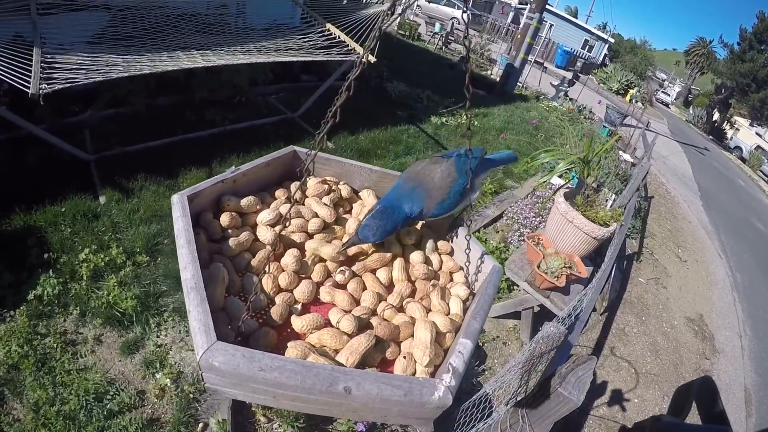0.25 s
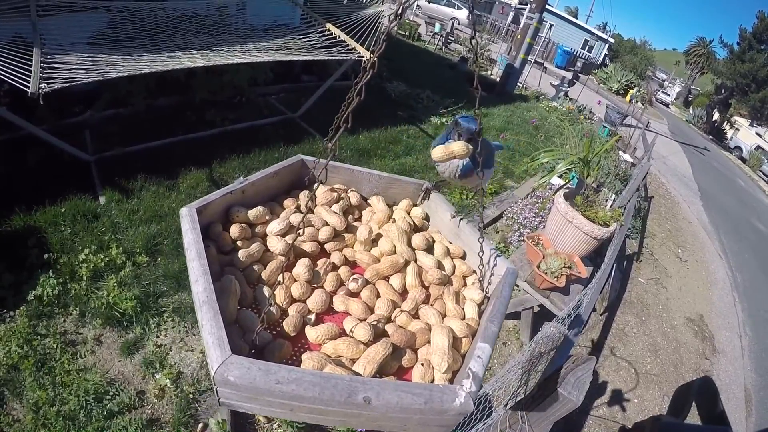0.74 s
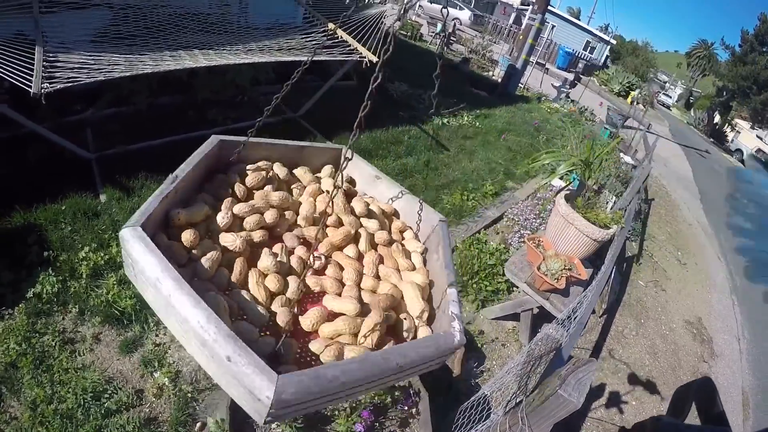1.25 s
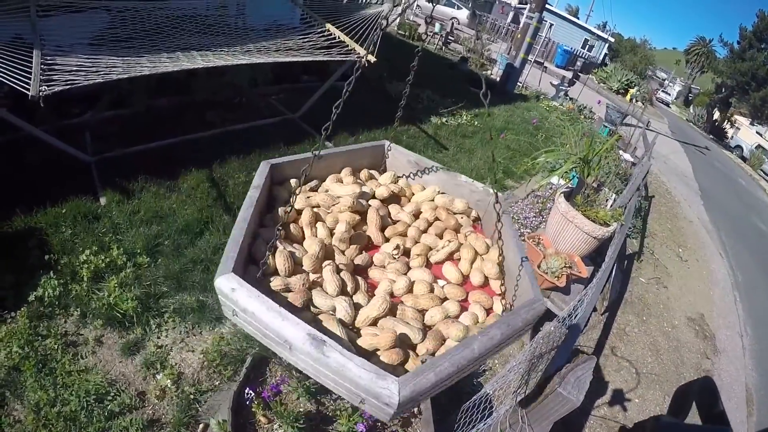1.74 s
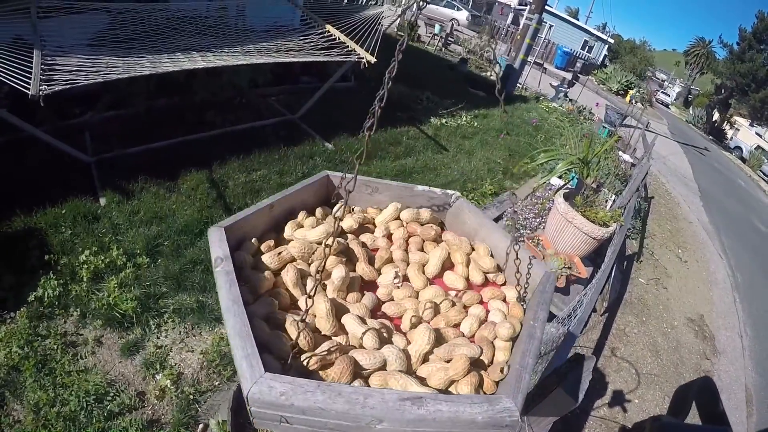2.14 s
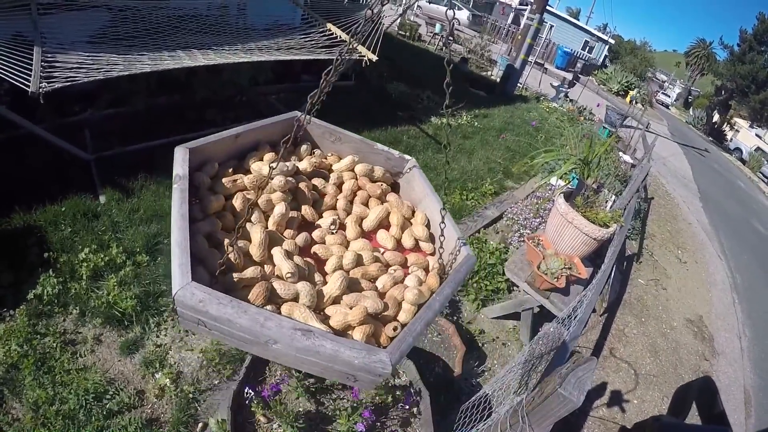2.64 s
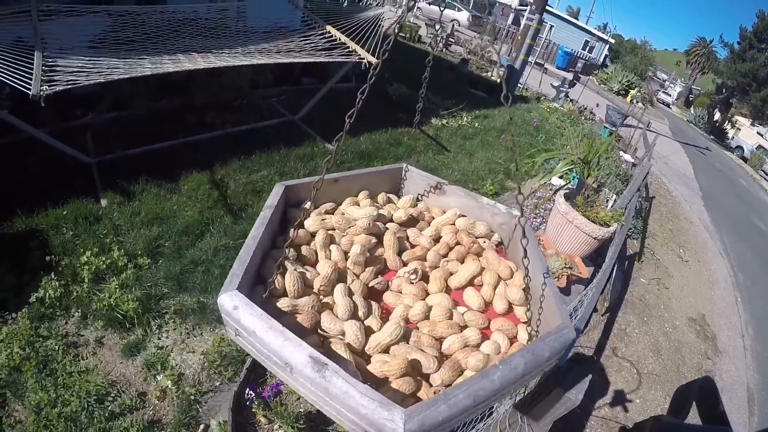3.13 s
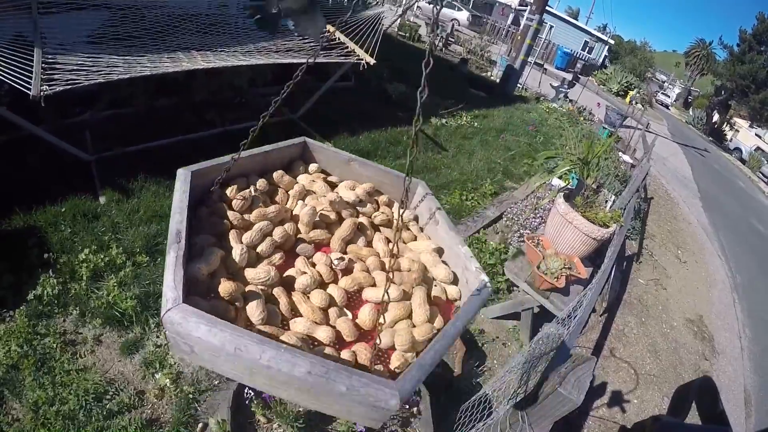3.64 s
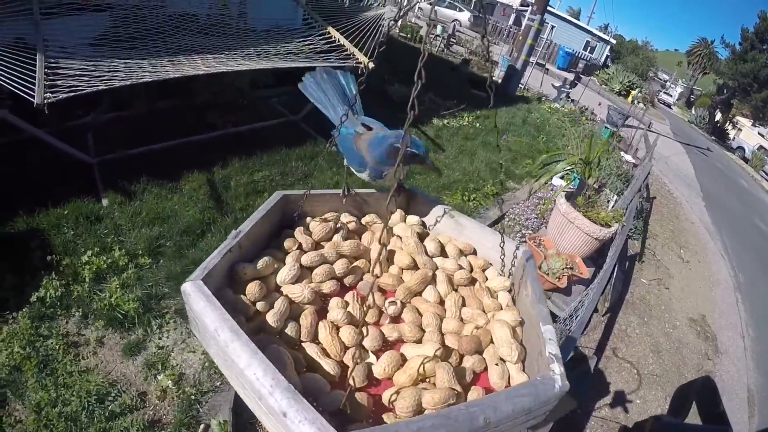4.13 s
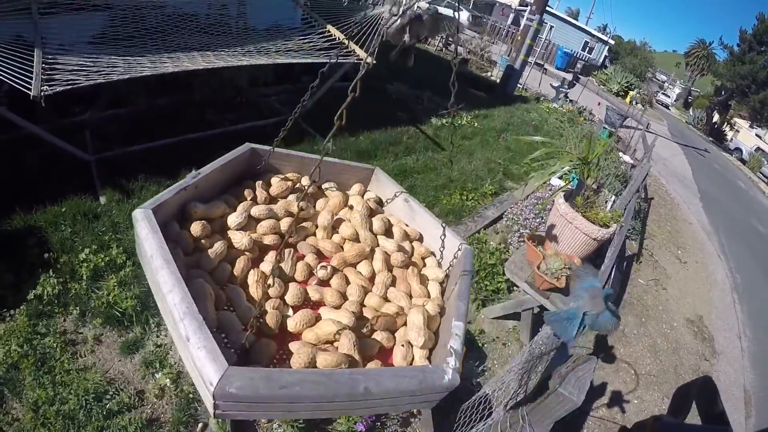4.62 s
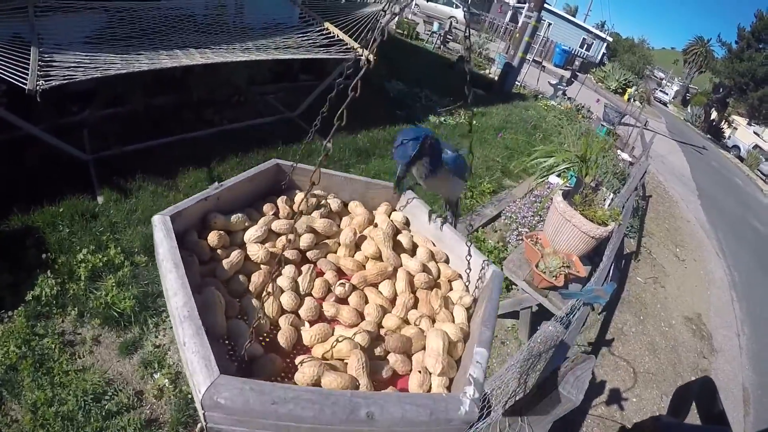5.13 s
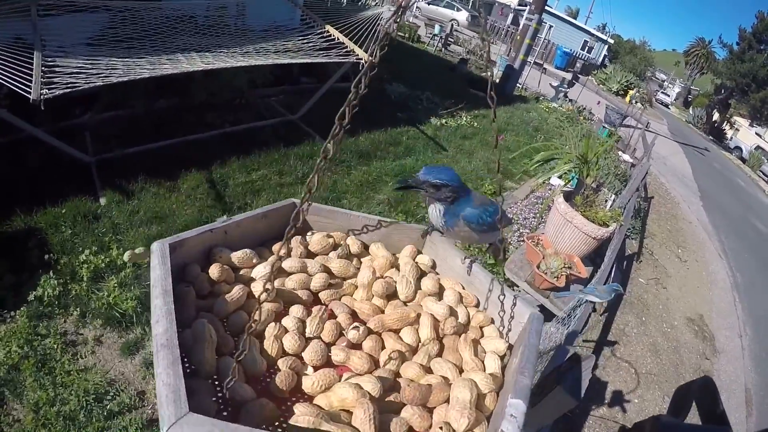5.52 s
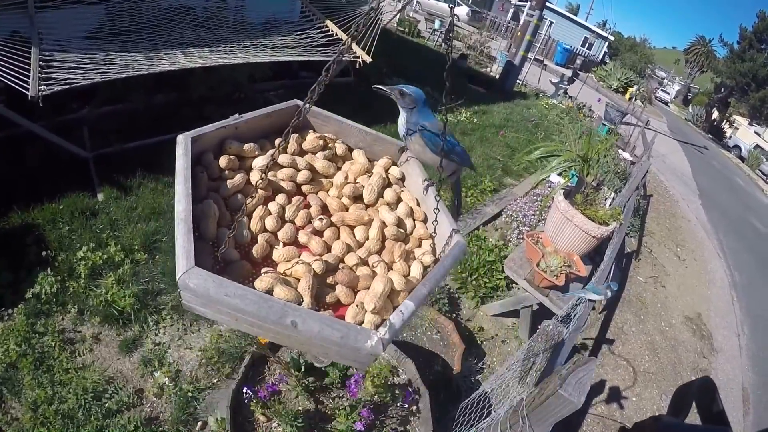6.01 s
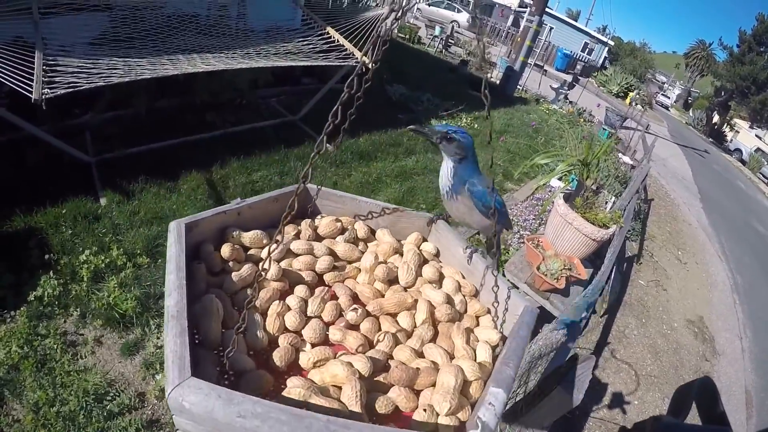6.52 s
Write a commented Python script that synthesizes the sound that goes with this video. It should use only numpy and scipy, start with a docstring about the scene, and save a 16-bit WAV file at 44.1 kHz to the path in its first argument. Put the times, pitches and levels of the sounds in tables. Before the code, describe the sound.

A jay rasps two runs of five harsh calls over hollow wooden tray knocks, ticking claws and gusts rumbling on the microphone outdoors.

```python
"""In a breezy front yard, a wooden tray feeder swings on chains: blows set its boards ringing, claws tick on the rim.
A jay gives two runs of five harsh calls, made of two gliding voices and the tones between them.
A dove coos and a small bird twitters in near-sine notes; filtered noise rustles faintly.
A wind chime tube rings twice as a pair of close tones, and an engine pulls away far off as a stack of sines.
Gusts of noise rumble on the microphone over the street's drone and hiss and a faint whine."""
import sys
import numpy as np
from scipy import signal
from scipy.fft import rfft, irfft, next_fast_len
from scipy.io import wavfile
from scipy.ndimage import uniform_filter1d

SR = 44100
rng = np.random.default_rng(int(sys.argv[2]) if len(sys.argv) > 2 else 0)


def transcribe(u):
    """Save the signal u as a 16-bit wav file named by the first command-line argument.

    u: samples, shape (n,) or (channels, n), limited to [-1, 1]; the rate is SR.
    q: integer samples, one column per channel.
    """
    v = np.clip(np.atleast_2d(u).T, -1, 1)
    q = np.round(v * 32767).astype(np.int16)
    wavfile.write(sys.argv[1], SR, q)


N = 298185
TIME = np.arange(N) / SR


def amp(db):
    """Gain of a level in dB."""
    return 10 ** (np.asarray(db) / 20)


def rms_one(x):
    """Scale a sound to an rms (average strength) of 1."""
    return x / np.sqrt(np.mean(x ** 2) + 1e-20)


def columns(rows, t):
    """Read each column of a curve table at times t; the first column holds the table's own times."""
    s, *cols = np.transpose(rows)
    return [np.interp(t, s, c) for c in cols]


def at_hz(points, hz):
    """Read the dB of a spectrum at hz, with straight lines on a log-frequency axis."""
    points = np.array(points)
    return np.interp(np.log(hz), np.log(points[:, 0]), points[:, 1])


def band(x, low_hz, high_hz, order=2):
    """Keep only the sound between two frequencies."""
    sos = signal.butter(order, [low_hz, min(high_hz, .49 * SR)], "band", fs=SR, output="sos")
    return signal.sosfilt(sos, x)


def wander(rate_hz, size=N):
    """Random drift of rms 1: noise smoothed so that little faster than rate_hz is left."""
    r = np.exp(-2 * np.pi * rate_hz / SR)
    run_in = int(SR / rate_hz)
    noise = rng.standard_normal(size + run_in)
    return rms_one(signal.lfilter([1], [1, -2 * r, r * r], noise)[run_in:])


def ring(x, hz, t60):
    """One way a body can vibrate: a unit click starts a sine of height 1 that falls 60 dB in t60 seconds."""
    r = amp(-60 / (t60 * SR))
    w = 2 * np.pi * hz / SR
    return signal.lfilter([0, np.sin(w)], [1, -2 * r * np.cos(w), r * r], x + 1e-18)


def coloured(spectrum):
    """Noise with a given spectrum, rms 1."""
    size = next_fast_len(N)
    hz = np.maximum(np.arange(size // 2 + 1) * SR / size, 1)
    shaped = rfft(rng.standard_normal(size)) * amp(at_hz(spectrum, hz))
    return rms_one(irfft(shaped, size)[:N])


def notes(tables, tremble_db):
    """Soft sine notes that follow curves of pitch and level, with a slight random tremble in level."""
    out = np.zeros(N)
    for note in tables:
        hz, db = columns(note, TIME)
        on = (TIME > note[0][0]) & (TIME < note[-1][0])
        tone = np.sqrt(2) * np.sin(2 * np.pi * np.cumsum(hz) / SR)
        out += on * amp(db + tremble_db * wander(22)) * tone
    return out


def struck(events, modes):
    """Each blow is a short rattle of contacts that sets off the vibrations (modes) of the wood."""
    size = 1000      # samples of push in each blow
    out = np.zeros(N)
    chance = rng.standard_normal((len(events), size))
    for hz, level_db, t60, board in modes:
        force = np.zeros(N + size)
        for (s, db, contact_ms, side_db, tilt_db), noise in zip(events, chance):
            # low modes build up later
            t = TIME[:size] / (max(contact_ms, .2) / 1000) * (hz / 1000) ** .35
            push = noise * (t + 0.18) * np.exp(-2.5 * t)
            # how much of this push the mode takes up, evened out below
            at_mode = abs(np.sum(push * np.exp(2j * np.pi * hz * TIME[:size])))
            taken = at_mode + .3 * np.sqrt(np.sum(push ** 2))
            tilt = tilt_db * np.log2(hz / modes[0][0])
            gain_db = db + level_db + tilt + np.sign(board) * side_db / 2
            begin = int(s * SR)
            force[begin:begin + size] += amp(gain_db) * push / taken
        out += ring(force[:N], hz, t60)
    return band(out, 380, 20000, order=3)      # small boards radiate no bass


def wind():
    """Eddies press on the microphone: a lumpy rumble and a faster flutter, rounded off when strong."""
    # Strength of the wind. Each row: time in seconds, rumble level in dB, flutter level in dB.
    gusts = [(0, -38.5, -56), (.38, -30, -51.5), (1.0, -41, -48.5), (1.09, -27, -33), (1.49, -27, -41),
             (1.73, -42.5, -58), (1.94, -33, -40.5), (2.4, -40.5, -42.5), (3.2, -49.5, -55.5),
             (3.63, -29.5, -42.5), (4.2, -44, -56), (4.4, -36.5, -49), (4.5, -31, -36.5), (4.95, -27, -38),
             (5.14, -36.5, -59), (5.59, -27, -45.5), (5.65, -26, -32), (6.4, -22.5, -29.5),
             (6.48, -37, -45), (6.7, -20, -31.5), (6.76, -13.5, -29)]
    # Single eddies. Each row: time in seconds, change of the rumble in dB, change of the flutter in dB.
    buffets = [(.39, 7, 5), (.74, 11, 13.5), (1.1, 10.5, 12.5), (1.26, 11, -2), (1.9, 14.5, 15),
               (2.129, 11.5, 8), (2.26, 10, 5), (3.6, 9.5, 6), (4.31, 4.5, 3), (4.58, 5.5, 1),
               (4.95, 5.5, 5), (5.672, 9, 13.5), (5.79, 8, 12), (5.88, 2, 3.5), (6.009, 4.5, 3),
               (6.182, 5, 12.5), (6.311, -1, 7.5), (6.681, -8.5, 16.5)]
    # Colour of the flutter. Each row: frequency in Hz, level in dB per Hz.
    flutter_colour = [(41, -28), (70, 10), (120, -4.5), (302, -23), (485, -28), (635, -78), (1350, -66.5),
                      (1500, -55), (1950, -104), (3300, -120)]
    buffet_s = 0.026      # spread of each eddy around its middle
    top = 0.41      # height at which the capsule flattens the strongest eddies
    rumble_db, flutter_db = columns(gusts, TIME)
    for s, low_db, high_db in buffets:
        bump = np.exp(-.5 * ((TIME - s) / buffet_s) ** 2)
        rumble_db = rumble_db + low_db * bump
        flutter_db = flutter_db + high_db * bump
    lumps = wander(22)
    rumble = rms_one(band(rng.standard_normal(N), 28.1, 48.6)) * amp(rumble_db + 2.7 * lumps)
    flutter = coloured(flutter_colour) * amp(flutter_db + 1.25 * lumps + 4.0 * wander(39.46))
    return top * np.tanh((rumble + flutter) / top)


def street():
    """The far street: two bands of shaped noise, a low drone and a hiss, mostly growing quieter."""
    # Each row: time in seconds, drone level in dB, hiss level in dB.
    levels = [(0.0, -44, -60), (1.35, -42.5, -60), (1.6, -45.5, -61.5), (2.9, -47.5, -64),
              (4.0, -48.5, -61), (4.8, -48.5, -65.5), (6.02, -52.5, -63), (6.76, -47.5, -64)]
    # Colours of the two noises. Each row: frequency in Hz, level in dB per Hz.
    drone_colour = [(40, -22.5), (70, 4), (110, -13.5), (200, -12), (330, -17), (520, -19.5), (700, -29),
                    (1300, -34), (2200, -41.5), (4000, -91.5)]
    hiss_colour = [(710, 2), (1200, -14.5), (1890, -4.5), (2120, -1.5), (2440, -3), (2800, -0.5),
                   (3310, -5.5), (5570, -7.5), (6950, -14.5), (9650, -16.5), (15000, -19.5)]
    drone_db, hiss_db = columns(levels, TIME)
    return amp(drone_db) * coloured(drone_colour) + amp(hiss_db) * coloured(hiss_colour)


def whine():
    """A faint steady whine: a very narrow band of noise, so its pitch is slightly blurred."""
    centre_hz, level_db = 9550, -86
    return amp(level_db) * rms_one(band(rng.standard_normal(N), centre_hz - 60, centre_hz + 60))


def engine():
    """A far motor gaining speed: sines at multiples (orders) of its turning rate, each wavering in level."""
    # Each row: time in seconds, turns per second, level in dB.
    speed = [(0, 38, -38), (.5, 42, -37), (1.0, 45.5, -39), (1.2, 46, -60)]
    # Each row: multiple of the turning rate, level in dB.
    orders = [(2, 0), (3, -9), (4, -16), (6, -20)]
    turns, db = columns(speed, TIME)
    phase = 2 * np.pi * np.cumsum(turns) / SR
    running = TIME < speed[-1][0]
    tones = sum(amp(order_db + 2.2 * wander(2.93)) * np.sin(k * phase) for k, order_db in orders)
    return amp(db) * running * tones


def claws():
    """Claws tick on the tray's rim: very short contacts set off quickly fading vibrations."""
    # Each row: time in seconds, level in dB, brightness in dB per octave.
    ticks = [(0.2384, -47, 3.5), (1.116, -48, 1), (1.1458, -36, 0), (1.1913, -26, 0), (1.3179, -35.5, 0),
             (1.4154, -53, 5.5), (3.8014, -32.5, 4.3), (3.824, -37, 1), (4.2737, -46.5, 5),
             (4.3127, -30.5, -2.5), (4.332, -37, 0.5), (4.369, -50, 4), (4.8856, -29, -7.5),
             (5.2934, -45.5, 6.5), (5.4046, -50, 3.5)]
    # Vibrations of the rim. Each row: frequency in Hz, level in dB, time to fade by 60 dB in seconds.
    rim = [(1300, -3, .025), (1950, -3, .018), (2850, -3, .016), (3600, -6, .014), (5000, -11, .011),
           (9000, -21, .009), (13000, -23, .008)]
    contact_ms = 1.2
    blows = [(s, db, contact_ms, 0, tilt_db) for s, db, tilt_db in ticks]
    return struck(blows, [(hz, db, t60, 0) for hz, db, t60 in rim])      # 0: neither board


def tray_knocks():
    """The tray bumps: blows set off the vibrations of its floor board and side board."""
    # Each row: time in seconds, level in dB, contact time in milliseconds (for a mode at 1000 Hz),
    # side board over floor board in dB, brightness in dB per octave.
    knocks = [(1.194, -12, 2.5, 3, -5.5), (1.291, -21, 7.65, 6, -5.5), (1.324, -17.5, 12.5, 17.5, -2.5),
              (1.416, -27, 5.4, 11, -2.5), (1.458, -30.5, 6, -4, -4), (1.499, -26, 29, 9, -4),
              (1.626, -27.5, 9.3, 15, -2), (1.899, -30.5, 7.2, 18, -5), (1.937, -10.5, 5.9, 4.5, -4.5),
              (2.116, -36.5, 7.8, -4, -21), (2.287, -48, 5.2, 3, -10), (2.311, -14, 8.2, -3, -3),
              (3.154, -32.5, 4.1, -5, -20), (3.446, -27, 4.7, 1, 3), (3.829, -28.5, 2.4, 1, 2),
              (3.923, -24, 2.12, -5, 5), (4.001, -40, 4.6, -18, -8), (4.491, -39, 15, -14, -7.5),
              (5.024, -28.5, 3.05, -6, -5)]
    # Vibrations of the boards. Each row: frequency in Hz, level in dB, time to fade by 60 dB in seconds,
    # board (-1 is the floor, 1 is the side).
    boards = [(468.8, -9, 0.14, -1), (486.6, -13, 0.11, 1), (663, -16.5, 0.1, 1), (735.5, -19.5, 0.1, -1),
              (898, -16.5, 0.061, -1), (1153, -23, 0.075, 1), (1447, -38, 0.049, -1),
              (1643, -20, 0.033, -1), (2310, -17.5, 0.022, 1), (2656, -17.5, .03, -1),
              (2980, -34, 0.045, 1), (3460, -23, 0.084, -1), (4100, -36, 0.048, -1), (6300, -65, 0.088, 1)]
    return struck(knocks, boards)


def yard(x):
    """Fences and house walls return a dense scatter of echoes that dies away."""
    t60_s = 0.44      # time to fade by 60 dB
    t = TIME[:int(.7 * SR)]
    scatter = band(rng.standard_normal(len(t)), 1000, 6700)
    late = np.clip(t / 0.002 - 1, 0, 1)      # silent for 2 ms, full at 4 ms
    tail = scatter * amp(-60 * t / t60_s) * late
    return signal.fftconvolve(x, tail / np.sqrt(np.sum(tail ** 2)))[:N]


def rustle():
    """Something rustles faintly: short grainy swells of mid and treble noise."""
    # Each row: middle in seconds, spread in seconds, level in dB.
    swells = [(.42, .08, -66.5), (6.455, .012, -66), (6.55, .015, -70), (6.62, 0.029, -64.5)]
    swell = sum(amp(db) * np.exp(-.5 * ((TIME - s) / width) ** 2) for s, width, db in swells)
    grains = band(rng.standard_normal(N), 2300, 5900) * amp(2.2 * wander(80))
    return swell * rms_one(grains)


def dove():
    """A dove's three coos: near-sine notes that slide up, swell and drop off."""
    # Each row: start in seconds, length in seconds, level in dB.
    coo_notes = [(0.854, 0.111, -51), (1.113, 0.23, -46), (1.746, 0.12, -43)]
    # Course of one note. Each row: share of its length, pitch in Hz, dB relative to the note's level.
    coo_shape = [(0, 492, -11), (.24, 530, -2.5), (.7, 524, 0.5), (1, 510, -7.5)]
    coos = []
    for s, length, level_db in coo_notes:
        coos.append([(s + part * length, hz, level_db + db) for part, hz, db in coo_shape])
    return notes(coos, tremble_db=1.5)


def jay():
    """One side of the syrinx (voice organ) glides up cleanly; the other joins, falling, and makes a rasp."""
    # Each row: start in seconds, stretch in time of the glides, pitch factor,
    # treble in dB per octave as the head turns, lag of the near echo in milliseconds,
    # peak level in dB, length in seconds.
    calls = [(2.718, 0.93, 1.015, 3.5, 1, -31, .22), (2.999, 1.08, 0.98, 5, 1.05, -33, .22),
             (3.282, 1.07, 1.006, 3.5, 1.06, -32.5, .21), (3.573, 0.97, 0.97, 6, 1.06, -32.5, .21),
             (3.851, 1, 1, 5, 1.088, -35.5, 0.2), (4.577, 1, 1.09, 10.5, 1.71, -33.5, .195),
             (4.861, 0.87, 1.02, 10, 1.585, -34, .19), (5.132, 0.94, 1.02, 10, 1.48, -35.5, 0.18),
             (5.42, 0.994, 1.005, 8.5, 1.6, -37.5, .19), (5.702, 1.1, 0.99, 11, 1.6, -40, .21)]
    # Course of a call before its stretch and pitch factor. Each row: time in seconds,
    # first voice in Hz, second voice in Hz, beak resonance in Hz.
    glides = [(0, 734, 1522, 1500), (.012, 1079, 1492, 2450), (.026, 1472, 1436, 2930),
              (.042, 1890, 1396, 3080), (.055, 1963, 1263, 3600), (.07, 1911, 968, 3620),
              (.087, 1734, 860, 3350), (.105, 1462, 709.3, 3900), (.14, 1186, 626.5, 4500),
              (.19, 1088, 595, 4700)]
    # Course of the tone colour, stretched alike. Each row: time in seconds, share of the second voice 0-1,
    # roughness 0-1, loss below the beak resonance in dB per octave, loss of treble in dB per octave.
    voicing = [(0, .3, .35, 0, 14), (.034, .08, .3, 0, 9), (.05, .8, .5, 1, 2), (.09, .9, .55, 1, 0),
               (.12, .9, .65, 9, 4), (.15, .9, .8, 17, 12), (.19, .9, .85, 22, 18)]
    # Colour of the throat. Each row: frequency in Hz, level in dB.
    throat = [(900, -54), (1350, -23), (1600, -6), (2000, -0.5), (2400, 10.5), (2900, 7), (3400, 4.5),
              (3850, 6), (4400, 3.5), (5100, 5), (6000, 5), (7600, -8.5), (11500, -25), (13700, -25.5),
              (15200, -34.5)]
    # Sum and difference tones of the two voices. Each row: multiple of the second voice, level in dB.
    mixtures = [(-1, -8), (1, 0.5), (2, -5.5)]
    beak_db, beak_octaves = 8, .2      # height and spread of the beak resonance
    near_echo_db = -5
    # effort jumps in, swells to its peak, sags and is cut off: shares of the length, dB under the peak
    effort_parts = [0, 0.16, 0.47, 0.71, 1]
    effort_levels_db = [-16.5, -4, 0, -7.5, -28]
    out = np.zeros(N)
    for start, stretch, factor, tilt_db, echo_ms, peak_db, length in calls:
        a, b = int(start * SR), int((start + length) * SR)
        size = b - a
        t = TIME[a:b] - start
        first, second, beak_hz = columns(glides, t / stretch)
        share, rough, loss_db, dull_db = columns(voicing, t / stretch)
        first = factor * first * (1 + .07 * rough * wander(70, size=size))
        second = second * (1 + .08 * wander(40, size=size))
        first_phase, second_phase = 2 * np.pi * np.cumsum([first, second], axis=1) / SR
        voice = 0
        for m in range(1, 15):      # multiples of the first voice
            for n, db in [(0, 0.0091)] + mixtures:
                hz = np.clip(m * first + n * second, 100, 16000)
                treble_octaves = np.maximum(np.log2(hz / 5500), 0)
                colour = at_hz(throat, hz) + (tilt_db - dull_db) * treble_octaves
                colour = colour + beak_db * np.exp(-.5 * (np.log2(hz / beak_hz) / beak_octaves) ** 2)
                colour = colour - loss_db * np.maximum(np.log2(beak_hz / hz), 0)
                # each line comes and goes, and unsteady air flow widens it
                flicker = amp(7.5 * rough * wander(90, size=size))
                smear = (.45 + .22 * m) * rough * wander(300, size=size)
                wave = np.sin(m * first_phase + n * second_phase + smear + m * m)
                voice = voice + amp(colour + db) * flicker * (share if n else 1) * wave
        # a surface close to the perch combs the spectrum until the head turns away
        lag = int(echo_ms * SR / 1000)
        delayed = np.r_[np.zeros(lag), voice[:-lag]]
        voice = voice + amp(near_echo_db - loss_db) * delayed
        # even out the loudness, then apply the effort
        even = voice / np.sqrt(uniform_filter1d(voice ** 2, size=900) + 1e-12)
        effort_db = np.interp(t / length, effort_parts, effort_levels_db)
        out[a:b] = even * amp(peak_db + effort_db) * signal.windows.tukey(size, .15)
    return out


def chime():
    """A metal tube is struck lightly and rings in two close tones that beat, until the clapper damps it."""
    # Each row: time in seconds, level in dB, seconds until the clapper has damped it.
    strikes = [(3.577, -57.5, 0.93), (5.245, -56, .88)]
    # The close pair. Each row: frequency in Hz, level in dB, time to fade by 60 dB in seconds.
    tube = [(1339, 3.5, 3.1), (1307, -8.5, 6)]
    out = np.zeros(N)
    for s, db, held in strikes:
        click = amp(db) * (np.arange(N) == int(s * SR))
        damped = np.clip((s + held - TIME) / .04, 0, 1)      # the last 40 ms fade out
        out += damped * sum(amp(level_db) * ring(click, hz, t60) for hz, level_db, t60 in tube)
    return out


def twitter():
    """A small bird far off: a near-sine note that swells twice, with a strong tremble."""
    # Each row: time in seconds, pitch in Hz, level in dB.
    twitter_curve = [(6.5, 1780, -88), (6.535, 1780, -69), (6.575, 1760, -84), (6.605, 1770, -66),
                     (6.63, 1850, -88)]
    return notes([twitter_curve], tremble_db=4.0)


def scene():
    """The jay and the close tray with their echoes, over the far street and the wind."""
    tray = claws() + tray_knocks()
    calls = jay()
    echoes = amp(-14) * yard(calls + .4 * tray)      # the tray is close and sounds drier
    background = wind() + street() + whine() + engine()
    small_sounds = rustle() + dove() + chime() + twitter()
    return (background + small_sounds + tray + calls + echoes)[None]


def record(dry):
    """A steep filter cuts the top: everything above the cutoff is at least 60 dB down."""
    cutoff_hz = 15330
    return signal.sosfilt(signal.cheby2(24, 60, cutoff_hz, fs=SR, output="sos"), dry)


dry = scene()
out = record(dry)
transcribe(out)
```